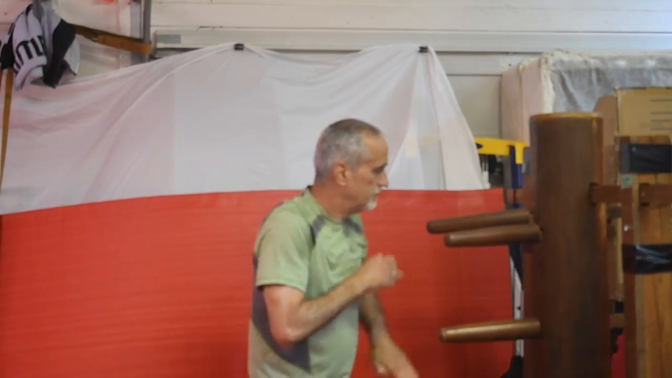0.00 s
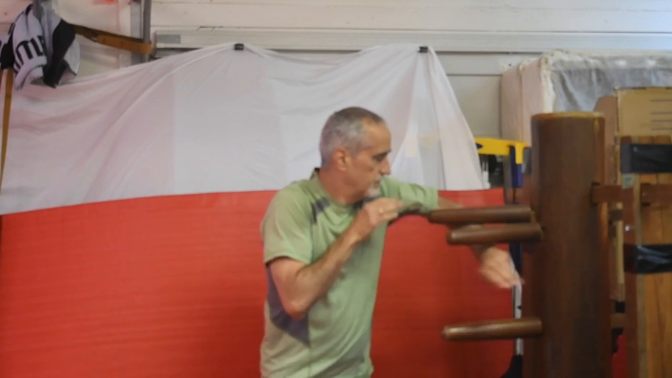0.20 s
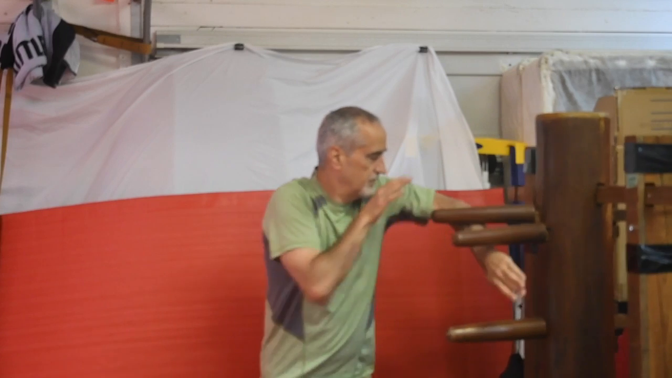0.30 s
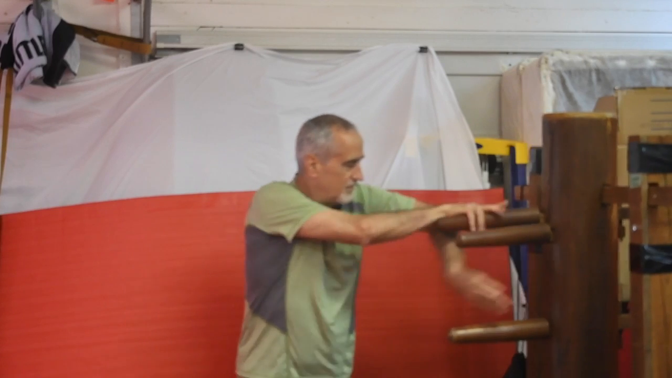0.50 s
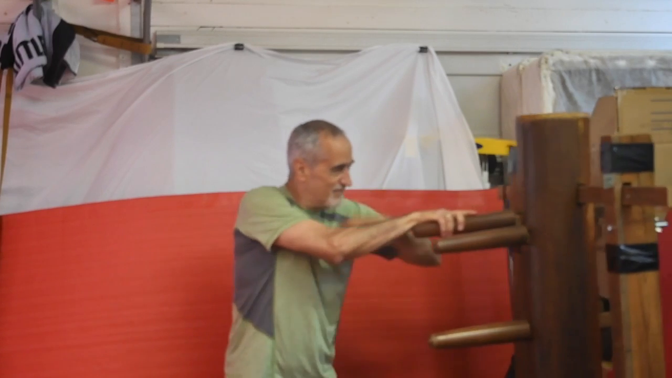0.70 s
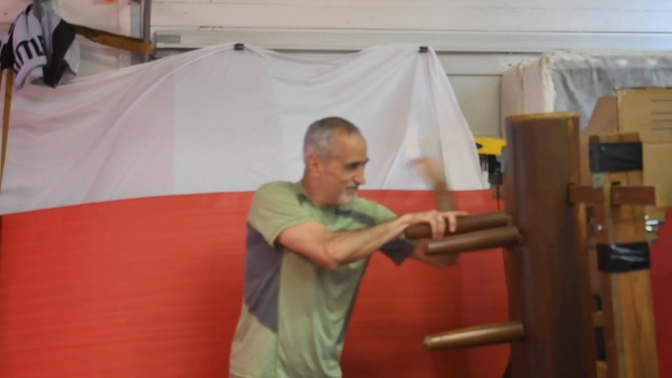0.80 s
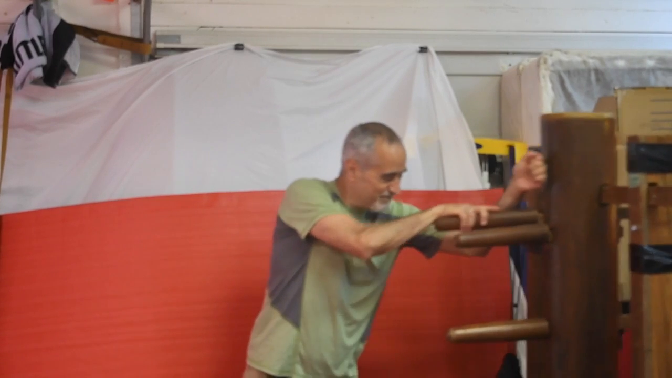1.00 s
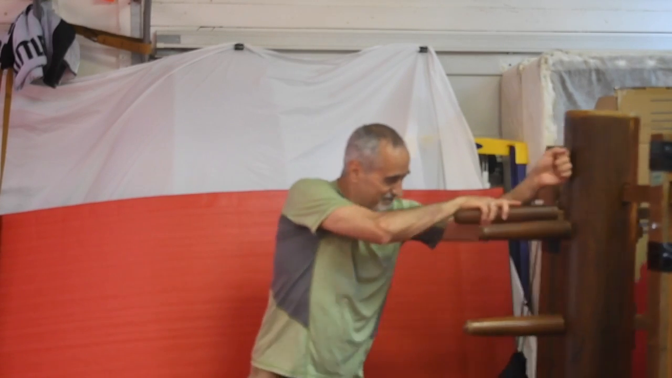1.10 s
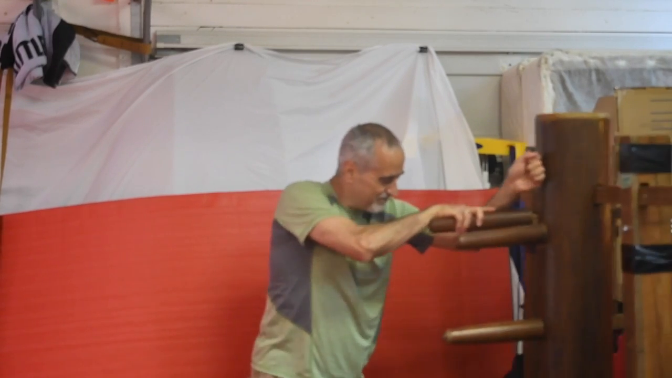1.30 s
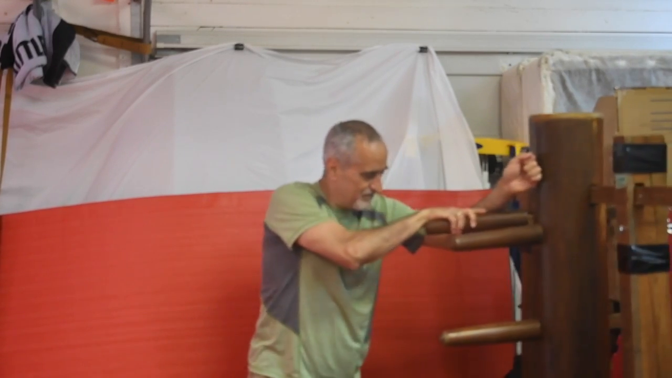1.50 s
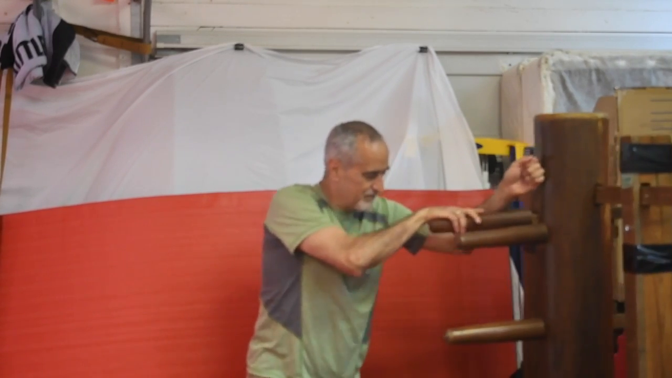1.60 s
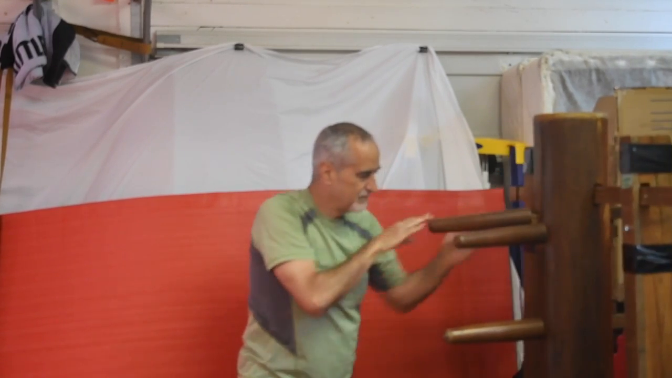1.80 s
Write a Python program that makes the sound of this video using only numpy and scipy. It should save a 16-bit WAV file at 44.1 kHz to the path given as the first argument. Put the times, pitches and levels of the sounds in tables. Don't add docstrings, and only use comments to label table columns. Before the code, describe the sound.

Hands and forearms strike a wooden training dummy. A faint dull thud opens, then a very loud, flattened clack and slap bursts at 0.25 s. Knocks follow at 0.43-0.6, with thuds near 0.7. Echo fades over light cloth rubs until 1.0; a second flurry clatters at 1.08, 1.22 and 1.3-1.44. Quiet room hush follows, with a faint thud and tiny creak near 1.75. Reverberant hard-walled room, distant stereo microphones.

```python
import sys
import numpy as np
from scipy import signal
from scipy.fft import rfft, irfft, next_fast_len
from scipy.io import wavfile
from scipy.ndimage import uniform_filter1d, minimum_filter1d

SR = 44100
rng = np.random.default_rng(int(sys.argv[2]) if len(sys.argv) > 2 else 0)


def natural_amplitude(level_db):
    exponent = np.asarray(level_db, float) / 20
    return 10 ** exponent


def digitize_waveform(pressure):
    field = np.atleast_2d(pressure).T
    bounded = np.clip(field, -1, 1)
    quanta = np.round(bounded * 32767).astype(np.int16)
    wavfile.write(sys.argv[1], SR, quanta)


N = 81585

CLACK_TIMES = [.034, .223, .2445, .2535, .51, .551, .592, .668, 1.081, 1.222, 1.228, 1.405, 1.412]
CLACK_MODES = [1300, 560, 1060, 1400, 1020, 1400, 1380, 1460, 830, 1430, 1040, 800, 1460]
CLACK_LEVELS = [-37, -24, 19, 13, 1, 10, -15, -11, -6, 2.5, 6.5, -9, -3]
# f/main mode, level/dB, T60/s
ARM_MODES = [(.72, -13, .01), (1, 0, .025), (1.4, -8, .01), (1.72, -7, .008), (2.1, -9, .007),
             (2.7, -15, .005)]
CLACK_DIRECT_DB = 8

# t/s; then level/dB, brightness exponent, main resonance f/Hz
SLAP_TIMES = [.032, .2455, .2535, .47, .5525, .6468, .705, .778, .885, 1.003, 1.011, 1.076, 1.093, 1.193,
              1.2172, 1.357]
SLAPS = [(-33, -0.86, 2200), (-1, -1.1, 2900), (20, -0.74, 2460), (-16.5, -0.49, 2140), (-6, -1.58, 2280),
         (-3, -0.12, 2280), (-11.5, -0.67, 2300), (-19.5, -0.27, 2600), (-24, -0.42, 2320),
         (-29.5, -1.2, 2700), (-18, -0.57, 2770), (-28, -0.73, 2300), (-5.5, -1.09, 2230),
         (-29, 0.76, 2400), (7, -0.29, 2400), (-1.5, -0.48, 1870)]
# f/main resonance, width/main resonance, level/dB
PALM_RESONANCES = [(.6, .25, -4), (1, .13, 0), (1.35, .3, -10), (1.85, .2, 0), (2.6, .6, -6.5),
                   (3.7, .6, -3)]
SLAP_DIRECT_DB, SLAP_BROAD_DB, SLAP_LOW_HZ = -6, -7, 860

# t/s; then level/dB, contact hardness f/Hz
THUD_TIMES = [.003, .037, .066, .27, .43, .556, .66, .695, .735, .768, 1.035, 1.08, 1.113, 1.226, 1.265,
              1.318, 1.372, 1.39, 1.407, 1.44, 1.752]
THUDS = [(-22, 410), (-26, 410), (-25, 170), (3, 500), (-5, 1200), (-19, 300), (-2, 630), (-2, 730),
         (-13.5, 370), (-25, 750), (-14, 380), (-3.5, 970), (1.5, 530), (-0.5, 980), (-1.5, 480),
         (-1.5, 510), (0.5, 1060), (-3, 480), (0, 700), (-13, 290), (-23.5, 560)]
# f/Hz, level/dB, T60/s
TRUNK_MODES = [(68, -6, 0.088), (140, -24, 0.097), (203, -11.5, 0.14), (243.6, -1.5, 0.06),
               (290, -2, 0.084), (363.2, -1, 0.077), (397.4, 4, 0.04), (445, -7, 0.088), (594, 5, 0.032),
               (668, 6, .03), (813, 5.5, 0.026), (1000, -24, .015)]

# start t/s, length t/s, level/dB
BRUSHES = [
    (0.022, 0.023, -60),
    (0.849, 0.064, -34),
    (1.0, 0.031, -34.5),
    (1.06, 0.072, -23.5),
    (0.746, 0.022, -41.5),
    (1.187, 0.019, -20.5),
]
# f/Hz, density level/dB
CLOTH_SPECTRUM = [(120, -6), (200, 4), (432, -15), (1320, -1.5), (5200, -8.5), (9350, -13), (15900, -10)]

# t/s; then lower mode level/dB, upper mode level/dB
CREAK_TIMES = [
    1.756,
    1.785,
    1.808,
    1.834,
]
CREAKS = [
    (-46.5, -70),
    (-37.5, -38.5),
    (-46, -38.5),
    (-66, -54),
]
CREAK_MODES = 1735, 2630
CREAK_T60_S, CREAK_RISE_S, CREAK_DIRECT_DB = 0.019, 0.0031, 9

# t/s, level/dB
STEPS = [
    (0.814, -30.5),
    (0.954, -35),
    (1.032, -40),
    (1.3, -31),
    (0.361, -31.5),
    (1.481, -35),
]
# f/Hz, level/dB, T60/s
BOARD_MODES = [(66, -8, .25), (137, 0, .15), (178, -6, .1)]

# f/Hz, T60/s
WALL_DECAY = [(100, 0.46), (400, 0.35), (1500, 0.52), (5000, 0.41), (10000, 0.38), (16000, 0.24)]
ROOM_DB, ROOM_GAP_S, ROOM_BUILD_S = 17, 0.0006, 0.0014
EARLY_DB, EARLY_T60_S, LATE_DB, LATE_SLOWER = 3.5, 0.013, -25, 2.34
# f/Hz, correlation
COHERENCE = [(40, .6), (150, .99), (350, .88), (700, .75), (1400, .42), (2800, .15), (5600, .08),
             (11000, -.12)]

# f/Hz, density level/dB
HUSH_SPECTRUM = [(20, -21), (66, -9), (95, -8.5), (200, -1.5), (380, 1), (800, -5.5), (4200, -11.5),
                 (12000, -13)]
HUSH_DB = -45.5
LOW_CUT_HZ = 158

# f/Hz, width f/Hz, gain
PORT_RESONANCES = [(4170, 1040, 0.22), (9720, 670, 0.37)]
# f/Hz, level/dB
STEREO_LEAN = [(60, -0.5), (1000, 1), (4000, 1.1), (8000, 1), (15000, -14)]
TOP_HZ, LEFT_LAG_S = 9900, 0.00003
LIMIT_DB, LIMIT_HOLD_S, RELEASE_DB_PER_S, LIMIT_SMOOTH_S = 4.5, 0.0014, 138.5, 0.00062
CLIP_TOP, CLIP_HARD = 1.16, 4


def unit(x):
    return x / np.sqrt(np.mean(x ** 2) + 1e-20)


def along(points, hz):
    f, value = np.transpose(points)
    return np.interp(np.log(hz + 1), np.log(f + 1), value)


def filtered(x, response):
    n = x.shape[-1]
    padded = next_fast_len(n + SR // 8)
    hz = np.fft.rfftfreq(padded, 1 / SR)
    return irfft(rfft(x, padded) * response(hz), padded)[..., :n]


def spread(pair):
    def mid_side_gains(hz):
        angle = np.arccos(np.clip(along(COHERENCE, hz), -1, 1)) / 2
        return np.array([np.cos(angle), np.sin(angle)])

    mid, side = filtered(pair, mid_side_gains)
    return np.array([mid + side, mid - side])


def ring(modes, rise_s, scatter_db):
    t = np.arange(SR // 5) / SR
    hz, db, t60 = np.transpose(modes)[:, :, None]
    db = db + scatter_db * rng.standard_normal(db.shape)
    modal = natural_amplitude(db - 60 * t / t60) * np.sin(2 * np.pi * hz * t)
    return modal.sum(0) * (1 - np.exp(-t / rise_s))


def room_response(direct_db):
    hz, t, noise = signal.stft(rng.standard_normal((2, SR * 3 // 5)), SR, nperseg=256)
    main_db = -60 * t / along(WALL_DECAY, hz)[:, None]
    early = natural_amplitude(EARLY_DB - 60 * t / EARLY_T60_S)
    late = natural_amplitude(LATE_DB + main_db / LATE_SLOWER)
    tail = signal.istft(noise * (natural_amplitude(main_db) + early + late), SR, nperseg=256)[1]
    build = 1 - np.exp(-np.arange(tail.shape[1]) / SR / ROOM_BUILD_S)
    tail = spread(tail * build)
    tail = natural_amplitude(ROOM_DB) * tail / np.linalg.norm(tail[0])
    tail = np.pad(tail, ((0, 0), (round(ROOM_GAP_S * SR), 0)))
    tail[:, 0] = natural_amplitude(direct_db)
    return tail


def add(out, sound, s, direct_db=0):
    heard = signal.fftconvolve(sound[None], room_response(direct_db), axes=1)
    at = max(round(s * SR), 0)
    out[:, at:at + heard.shape[1]] += heard[:, :N - at]


def clacks():
    out = np.zeros((2, N))
    for s, main_hz, db in zip(CLACK_TIMES, CLACK_MODES, CLACK_LEVELS):
        modes = [(main_hz * ratio, mode_db, t60) for ratio, mode_db, t60 in ARM_MODES]
        knock = natural_amplitude(db - 18.5) * ring(modes, rise_s=0.0015, scatter_db=-3.2)
        add(out, knock, s, CLACK_DIRECT_DB)
    return out


def slaps():
    out = np.zeros((2, N))
    push = signal.unit_impulse(SR // 20)
    for s, (db, slope, main_hz) in zip(SLAP_TIMES, SLAPS):
        def colour(f):
            total = natural_amplitude(SLAP_BROAD_DB)
            for ratio, width, peak_db in PALM_RESONANCES:
                damping = 1j * f * width * main_hz
                total = total + natural_amplitude(peak_db) * damping / ((ratio * main_hz) ** 2 - f * f + damping)
            low_cut = 1j * f / (SLAP_LOW_HZ + 1j * f)
            brightness = ((1 + 1j * f / 500) / 6) ** slope
            return total * low_cut * brightness

        add(out, natural_amplitude(db + 9.5) * filtered(push, colour), s, SLAP_DIRECT_DB)
    return out


def thuds():
    out = np.zeros((2, N))
    for s, (db, hard_hz) in zip(THUD_TIMES, THUDS):
        modes = [(hz, mode_db - 10 * np.log10(1 + (hz / hard_hz) ** 4), t60)
                 for hz, mode_db, t60 in TRUNK_MODES]
        add(out, natural_amplitude(db - 26) * ring(modes, rise_s=0.002, scatter_db=2.0), s)
    return out


def brushes():
    out = np.zeros((2, N))
    for s, length_s, db in BRUSHES:
        n = round(length_s * SR)
        noise = rng.standard_normal(SR // 5)
        flutter = unit(uniform_filter1d(rng.standard_normal(SR // 5), size=60))
        grain = noise * natural_amplitude(4.7 * flutter)
        rub = unit(filtered(grain, lambda hz: natural_amplitude(along(CLOTH_SPECTRUM, hz))))[:n]
        stroke = np.sin(np.pi * (np.arange(n) / n) ** 0.7)
        add(out, natural_amplitude(db - 10.5) * rub * stroke, s)
    return out


def creaks():
    out = np.zeros((2, N))
    for s, levels_db in zip(CREAK_TIMES, CREAKS):
        modes = [(hz, db, CREAK_T60_S) for hz, db in zip(CREAK_MODES, levels_db)]
        add(out, ring(modes, rise_s=CREAK_RISE_S, scatter_db=-3.5), s, CREAK_DIRECT_DB)
    return out


def steps():
    out = np.zeros((2, N))
    for s, db in STEPS:
        add(out, natural_amplitude(db - 15) * ring(BOARD_MODES, rise_s=0.013, scatter_db=-1.5), s)
    return out


def hush():
    noise = filtered(rng.standard_normal((2, N)), lambda hz: natural_amplitude(along(HUSH_SPECTRUM, hz)))
    return natural_amplitude(HUSH_DB) * unit(spread(noise))


def scene():
    blows = clacks() + slaps() + thuds() + brushes() + creaks()
    blows = filtered(blows, lambda f: (1j * f / (LOW_CUT_HZ + 1j * f)) ** 2)
    return blows + steps() + hush()


def microphones(x):
    def response(f):
        ports = 1 + sum(gain * 1j * f * width / (hz * hz - f * f + 1j * f * width)
                        for hz, width, gain in PORT_RESONANCES)
        top = (TOP_HZ ** 2 / (TOP_HZ ** 2 - f * f + 1j * f * TOP_HZ)) ** 3
        level = natural_amplitude(np.outer([0.5, -0.5], along(STEREO_LEAN, f)))
        lag = np.exp(np.outer([-1j, 1j], np.pi * f * LEFT_LAG_S))
        return ports * top * level * lag

    return filtered(x, response)


def limited(x):
    need_db = np.minimum(LIMIT_DB - 20 * np.log10(np.abs(x).max(0) + 1e-9), 0)
    held = max(round(LIMIT_HOLD_S * SR), 3)
    need_db = minimum_filter1d(need_db, size=held, origin=(held - 1) // 2)
    ramp = RELEASE_DB_PER_S * np.arange(N) / SR
    gain_db = np.minimum.accumulate(need_db - ramp) + ramp
    soft = max(round(LIMIT_SMOOTH_S * SR), 3)
    return x * natural_amplitude(uniform_filter1d(np.minimum(gain_db, 0), size=soft))


def roll_off(x):
    return signal.sosfilt(signal.butter(12, 16050, fs=SR, output="sos"), x)


def record(dry):
    x = limited(microphones(dry))
    mix = x / (1 + np.abs(x / CLIP_TOP) ** CLIP_HARD) ** (1 / CLIP_HARD)
    return roll_off(mix)


dry = scene()
out = record(dry)
digitize_waveform(out)
```